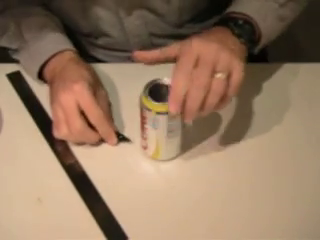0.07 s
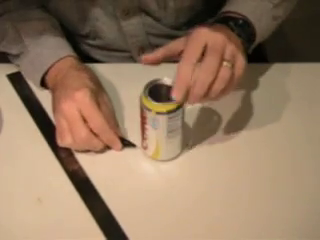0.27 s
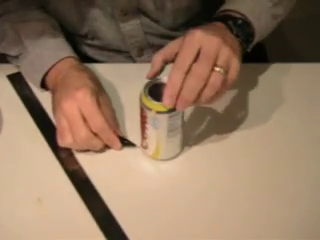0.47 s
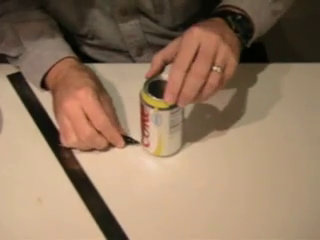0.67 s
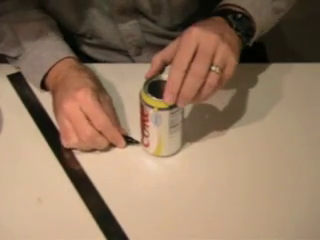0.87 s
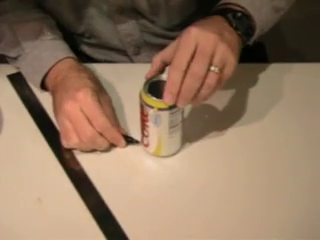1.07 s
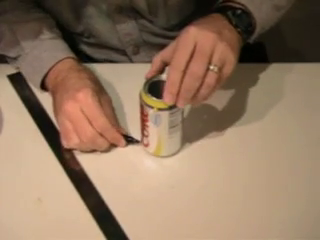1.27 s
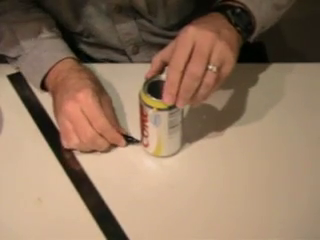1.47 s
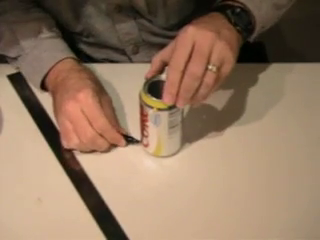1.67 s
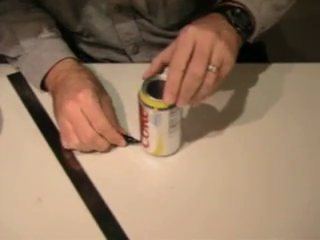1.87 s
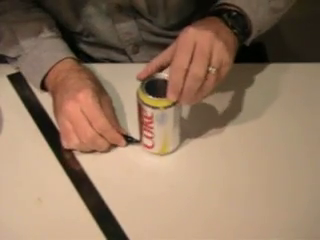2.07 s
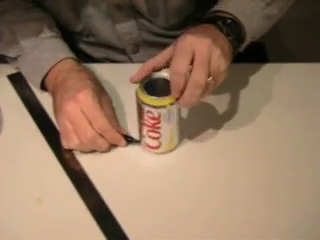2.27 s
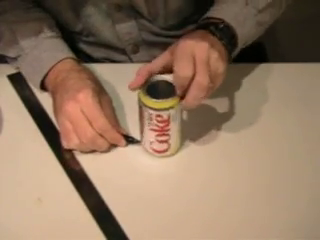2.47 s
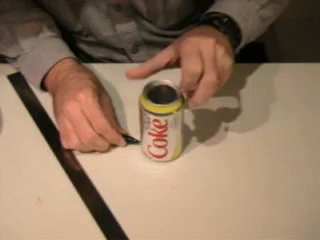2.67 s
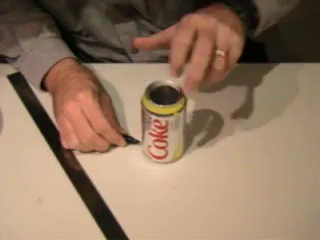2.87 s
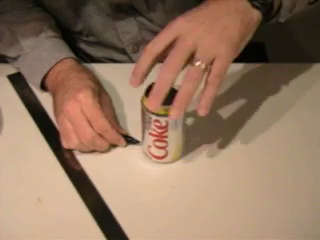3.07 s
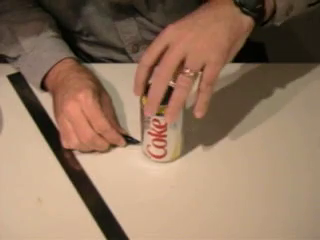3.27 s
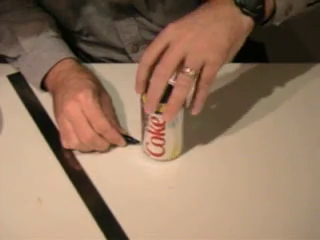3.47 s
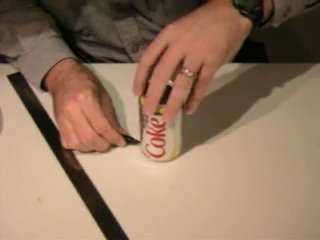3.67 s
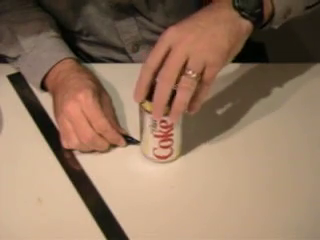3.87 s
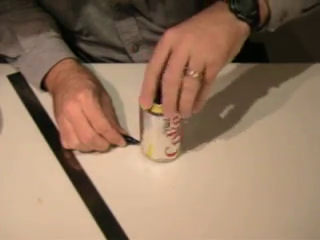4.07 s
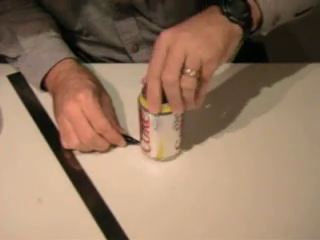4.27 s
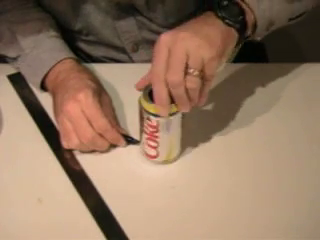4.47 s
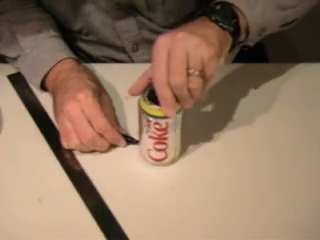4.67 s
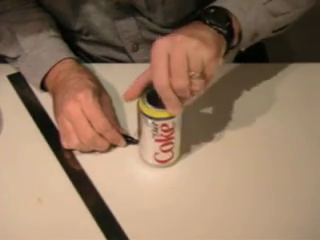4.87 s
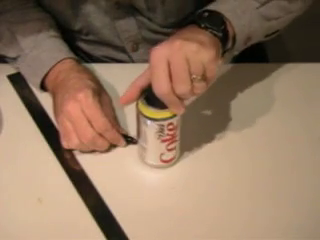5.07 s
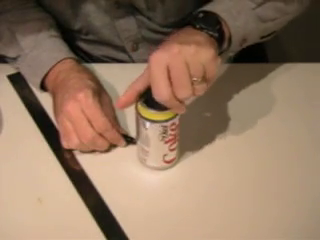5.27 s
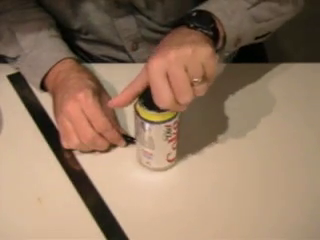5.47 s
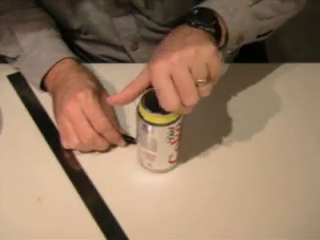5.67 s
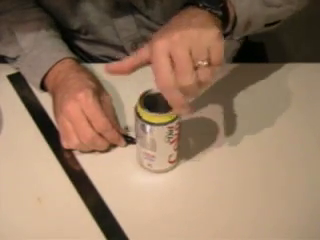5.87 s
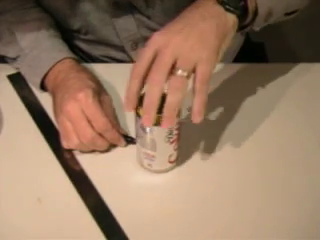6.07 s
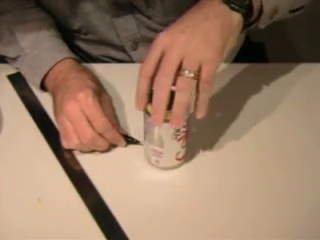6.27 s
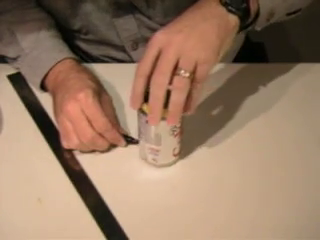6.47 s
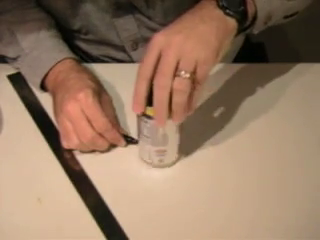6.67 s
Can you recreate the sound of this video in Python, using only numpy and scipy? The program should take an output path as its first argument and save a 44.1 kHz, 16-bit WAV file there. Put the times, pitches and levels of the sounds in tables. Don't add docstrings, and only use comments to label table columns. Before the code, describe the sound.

Hollow clunks, thin metallic ticks and gritty rubbing as fingers twist an empty drink can on a table in a quiet, humming room.

```python
import sys
import numpy as np
from scipy import signal
from scipy.fft import rfft, irfft
from scipy.io import wavfile

SR = 44100
rng = np.random.default_rng(int(sys.argv[2]) if len(sys.argv) > 2 else 0)


def ratio_of_db(decibels):
    return 10 ** (np.asarray(decibels, float) / 20)


def waveform_to_disk(signal):
    frames = np.transpose(np.atleast_2d(signal))
    scaled = np.clip(frames, -1, 1) * 32767
    samples = np.round(scaled).astype(np.int16)
    wavfile.write(sys.argv[1], SR, samples)


N = 296352
GRID = 32
BLOW_SAMPLES = 1400

# pitch_hz, level_db, t60_s
TABLETOP_MODES = [(92, -14, .2), (118, -12, .15), (155, -3, .14), (188, -9, .08), (221, -1, .14)]
CAN_AIR_MODES = [(470, -10, .05), (521, 0, .12), (557, -5, .09), (600, -8, .06), (642, -9, .06),
                 (687, -7, .09), (726, -7, .09), (798, -10, .06), (875, -9, .06), (1018, -11, .05),
                 (1120, -13, .04)]
WALL_MODES = [(1300, 0, .02), (1550, -2, .012), (1780, -1, .015), (2030, -3, .012)]
SHELL_MODES = [(2210, -3, 0.034), (2424, -10.5, 0.032), (2710, -6, 0.027), (2850, -3.5, 0.047),
               (2980, 1, 0.022), (3114, -6, 0.02), (3400, -4, 0.026), (3650, -13.5, 0.035)]
RIM_MODES = [(3920, -1.5, .006), (4410, -0.5, .006), (4870, -4.5, .005), (5530, -5, .005),
             (6050, -7.5, .005), (6500, -8.5, 0.0058), (6960, -13.5, 0.0058)]
BASE_MODES = [(314.2, -1, 0.085), (349.8, 4.5, 0.085), (397, 1.5, 0.033)]
# pitch_hz, level_db, t60_s
SINGING_MODES = [(5550, 0, .09), (6480, 0, .06), (4380, 0, .05)]
# pitch_hz, level_db, t60_s
DRAGGED_RIM_MODES = [(3950, 0, .03), (4650, -9, .02), (6500, -19, .035)]
# pitch_hz, level_db, t60_s
CONTACT_MODES = [(864, 3, 0.0028), (1692, -1.5, 0.0051), (2900, 1, 0.0031), (4550, -10, 0.0032)]

# freq_hz, level_db_per_hz
GRIT_COLOUR = [(53, -38), (90, -16), (154, 4.5), (259, -10.5), (342, 1), (1570, -9), (1750, -8),
               (2110, -18.5), (2840, -21.5), (6430, -35.5), (7600, -66), (9880, -77), (16700, -120)]
# freq_hz, level_db_per_hz
AIR_COLOUR = [(41, -34), (70, -2), (108, -7.5), (151, -9), (206, -10), (261, -19), (462, -22), (816, -27.5),
              (1500, -33.5), (1660, -27.5), (3170, -34.5), (5180, -42), (7670, -63.5), (9970, -95),
              (16900, -120)]
# freq_hz, level_db_per_hz
SKIN_COLOUR = [(1500, -17), (2300, -3), (3200, -0.5), (4000, -5), (4800, -8.5), (5800, -14.5),
               (6800, -23.5), (9000, -50.5)]
# freq_hz, level_db_per_hz
CRACK_COLOUR = [(400, -12), (900, 1.5), (2000, -4.5), (3500, -9.5), (5500, -17), (7500, -24.5), (9000, -50)]
# pitch_hz, level_db_rms
HUM_TONES = [(59.0, -57.5), (118.0, -73)]

# time_s, free_shell_pitch_hz, dragged_metal_ring_db
GRIP = [(0, 3280, 0), (.36, 3190, -2), (.49, 2800, 2.5), (.6, 2800, 4), (.68, 3070, -0.5), (1.9, 2900, 1),
        (2.44, 2850, 7), (2.5, 3400, 1), (2.65, 3400, 0.5), (2.72, 2800, -8.5), (4.2, 2870, -0.5),
        (4.3, 2850, 0.5), (4.45, 2810, -2), (5.3, 2850, -2), (5.45, 3650, -5), (5.55, 2920, -3.5),
        (6.72, 2850, 6)]
# start_s, length_s, grind_db, scratch_over_grind_db, hiss_over_scratch_db
PUSHES = [(-.07, 0.47, -54, -2, -12), (0.512, .12, -48, -7.5, -5.5), (0.62, 0.11, -55, -10, 5),
          (0.69, 0.16, -61, -9.5, 0.5), (1.945, 0.23, -60.5, -9.5, -3.5), (2.08, 0.37, -57.5, -15, 0.5),
          (2.379, 0.2, -50, -8, -8), (2.572, 0.096, -58, -14, -1), (2.687, 0.14, -53, -8.5, -13),
          (3.42, 0.12, -57.5, -19, -5), (3.578, 0.33, -55.5, -14, -8), (3.68, 0.35, -55.5, -7.5, -6),
          (3.95, 0.33, -51.5, -6, -9.5), (4.249, 0.2, -55, -16.5, 1), (4.366, .13, -49.5, -10, -7),
          (4.466, 0.27, -50, -6, -9), (4.652, 0.42, -55, -2.5, -9), (5.007, 0.27, -55.5, -8, -6),
          (5.238, .17, -54.5, -9, -6.5), (5.351, 0.24, -56.5, -3.5, -8.5), (5.622, 0.09, -58.5, -9.5, -3.5),
          (5.692, 0.16, -54, -23, -3), (6.343, 0.12, -46, -14, -13), (6.468, 0.062, -48.5, -9, -11)]
# start_s, grind_db, scratch_over_grind_db, fade_db_per_s
JERKS = [
    (.385, -66.5, -5, 20.5),
    (2.88, -81, -0.5, 31),
    (1.2, -60, -18, 252),
    (0.483, -46, -11.5, 149),
    (1.85, -45.5, -20, 201),
    (3.274, -43, -19.5, 196),
    (6.132, -37.5, -14, 107),
    (6.42, -56, -16.5, 1.5),
]
# start_s, length_s, load_db
LEANS = [(-.1, 0.72, -48), (0.526, 0.38, -58), (1.25, 0.34, -64.5), (1.897, 0.35, -62),
         (2.085, 0.29, -53.5), (2.375, 0.16, -44.5), (2.58, 0.13, -54.5), (2.729, .2, -51),
         (3.3, 0.25, -60), (3.633, 0.5, -56), (4.134, 0.14, -56.5), (4.338, 0.18, -49), (4.673, 0.32, -58),
         (4.952, 0.36, -51), (5.51, 0.1, -51), (5.612, 0.063, -57), (5.702, 0.24, -48.5),
         (6.122, 0.23, -48.5), (6.381, 0.23, -53.5)]
# load_db, grind_db, scratch_db, hiss_db
REST_LEVELS_DB = (-71, -69.5, -91, -94.5)

# time_s, peak_db, table_boom_db, contact_ms
PATS = [(.512, -40, -19, 5), (.554, -32.5, -8, 3.4), (.574, -35.5, -3.5, 8.5), (1.05, -50, -20, 3.2),
        (1.114, -53, 4.5, 2), (1.425, -50.5, 5, 4.5), (1.61, -52.5, -18, 5.2), (1.846, -37.5, -14, 4),
        (2.456, -54, 10, 7.9), (2.486, -49, 5, 3.9), (2.724, -25.5, 2.5, 8.4), (2.748, -35.5, 7.5, 2.6),
        (3.838, -41.5, -10, 2.8), (4.449, -60, -7, 3.1), (5.076, -63, 8, 2.9), (5.789, -42, -9.5, 7.3),
        (5.83, -45, 5, 9.5), (6.143, -24.5, -7, 2.7), (6.149, -24.5, -6, 5), (6.176, -33, -5, 2.6),
        (6.221, -46, -20, 6.3), (6.28, -30, -12.5, 1.4), (6.382, -42, -4, 5), (6.424, -38, -9, 3.5),
        (6.482, -43, -15, 3.5)]
# time_s, peak_db, table_boom_db, base_thud_db
ROCKS = [(.497, -40.5, 3, 2), (.529, -40, 5, 2.5), (.598, -38.5, -11, -1.5), (.754, -58.5, 11, 4),
         (0.878, -64.5, 18, -12), (2.442, -37.5, -5, 0), (2.677, -50.5, 12.5, 2), (2.707, -37.5, -14, 2),
         (2.73, -35.5, 1, -0.5), (2.783, -43.5, 12, 1), (2.798, -56.5, 6, 4.5), (2.823, -51, 9, -5),
         (3.217, -65.5, -14, 2), (3.277, -37, -2.5, 9.5), (3.283, -43, 0, -5), (3.35, -47.5, -7, -5),
         (3.782, -44.5, -5, -9), (4.422, -37.5, -4.5, -8), (5.141, -51.5, 11, -10), (5.258, -47, -15, -5),
         (5.559, -40, 1.5, -1.5), (5.645, -38.5, -0.5, -1), (5.659, -49, 4.5, 1), (5.76, -33, 3.5, -4.5),
         (5.778, -42.5, -8, -10), (6.203, -26.5, -19, -6.5)]
# time_s, peak_db, pitch_hz, fade_cycles
THUMPS = [(0.4973, -30.5, 330, 3.0), (.512, -37, 420, 3.0), (1.115, -51, 600, 2.5), (1.428, -52, 600, 2.5),
          (1.846, -34, 800, 3.4), (2.487, -41, 600, 3.0), (2.7215, -23, 597, 6.6), (2.781, -31.5, 400, 3.5),
          (3.217, -57, 600, 2.5), (3.781, -35, 700, 3.3), (4.423, -28, 420, 3.0), (5.077, -37.5, 230, 2),
          (5.14, -34.5, 260, 2.4), (5.257, -43, 600, 3.0), (5.558, -40, 300, 4.0), (5.645, -41, 480, 4.4),
          (5.759, -33.5, 520, 7.5), (6.144, -27, 600, 3.9), (6.1494, -18, 475, 4.0),
          (6.2026, -19, 620, 4.4), (6.38, -36, 900, 3.0), (6.419, -37, 600, 3.0)]
# time_s, peak_db, brightness_db, free_pitch_hz
CATCHES = [(.157, -45, -31, 3630), (.4279, -66, -30, 3230), (.4987, -44, -20, 2900), (.5411, -42, -5, 3200),
           (.5506, -34, -12, 3050), (.7603, -55, -12, 2630), (.882, -61, -10, 3040),
           (1.7923, -44.5, -16, 3320), (1.81, -49, -9.5, 3420), (2.038, -46, -14, 3150),
           (2.1595, -39, -17, 2980), (2.4864, -35, -28, 3270), (2.544, -49, -25, 3460),
           (2.6134, -48.5, -25, 3530), (2.7257, -41.5, -11, 2680), (3.4927, -55, -12, 2760),
           (3.6108, -42, -21, 2840), (4.4224, -34, -24, 3460), (5.5104, -40, -18, 2950),
           (5.5425, -46, -21, 2920), (5.5804, -53.5, -10.5, 2900), (5.6441, -50, -22, 2950),
           (6.1424, -31, -15, 2940), (6.2202, -37.5, -14, 2850), (6.2783, -41, -11, 2900),
           (6.3994, -49, -6, 2720), (6.4903, -44.5, -6.5, 2930)]
# time_s, peak_db, brightness_db
TAPS = [(.845, -56, -11), (1.051, -63, -16), (1.426, -62, -11), (1.4592, -56, -21), (1.61, -42.5, -9),
        (1.8453, -37, -7), (2.676, -60, -10), (2.7046, -61, -18), (2.7198, -45, -23), (2.781, -48.5, -10),
        (3.2737, -52.5, -10), (3.2843, -44, -14), (3.3626, -57, -4), (3.5552, -59, -22), (3.6455, -53, -6),
        (3.77, -50, -24), (4.149, -43.5, -16), (5.206, -58, -9), (5.2798, -52, -9), (5.741, -47, -9),
        (5.7589, -43, -14), (5.78, -56.5, 1.5), (6.1485, -47, -6), (6.176, -62, -7), (6.2031, -34, -26),
        (6.341, -48, -7), (6.473, -49, -10)]
# time_s, upper_tone_db, lower_over_upper_db
PINGS = [
    (2.6778, -88, 16),
    (2.7276, -58.5, 1),
    (2.7805, -71, 6),
    (5.7409, -69, -10.5),
    (5.7593, -61, -16),
    (5.7844, -62, -9),
]
# time_s, peak_db
CHIRPS = [
    (2.6793, -73),
    (5.714, -67),
]
# time_s, peak_db, chatter_ms, free_pitch_hz
SLIPS = [(.048, -48, 6.5, 3300), (.401, -64, 1.5, 3200), (.455, -64, 1.5, 3200), (.598, -47.5, 3.0, 3300),
         (.66, -47, 3.0, 3400), (3.73, -58, 3.0, 3600), (3.8195, -51.5, 3.0, 3400), (3.948, -54, 4.0, 3000),
         (4.0415, -58, 4.0, 2900), (4.081, -49, 12.0, 2900), (4.105, -51, 8.2, 2900), (4.2, -48, 6.0, 2900),
         (4.409, -52, 3.0, 3000), (4.512, -55, 4.0, 2900), (4.551, -53, 4.0, 2900), (4.573, -50, 3.0, 3200),
         (4.751, -50, 3.0, 2900), (4.788, -48, 12.0, 2850), (4.852, -53, 3.0, 3000),
         (4.975, -54, 4.0, 2900), (5.1415, -55, 3.0, 3000), (5.183, -56, 3.0, 3000),
         (5.459, -50, 5.0, 3600), (5.479, -51, 4.0, 3600), (6.238, -42, 6, 2900), (6.38, -48, 3.0, 2800),
         (6.593, -57, 3.0, 2900), (5.661, -56, 2.5, 3000), (5.5, -58, 1.5, 3000), (5.558, -56, 2.5, 3000),
         (6.435, -56, 2.5, 2900), (6.513, -52, 3.0, 2950), (6.162, -46, 3.0, 3300), (.512, -50, 3.0, 2900),
         (.575, -47, 5.0, 3200), (.7, -56, 4.0, 3300), (2.45, -50, 5.0, 2900), (2.465, -50, 5.0, 3000),
         (3.555, -58, 1.5, 2900)]
# start_s, length_s, pitch_hz, level_db
WHINES = [(0.039, .16, 3300, -61), (.53, .07, 3050, -56), (2.1, 0.22, 4000, -75), (2.17, .08, 2200, -71),
          (2.21, .09, 2930, -68), (2.409, .08, 2850, -60), (2.47, 0.05, 3400, -63), (3.79, .08, 3500, -70),
          (3.821, .05, 1770, -63), (4.07, .07, 2900, -60), (4.11, .12, 1780, -63), (4.17, 0.06, 2900, -64),
          (4.21, .2, 6500, -84.5), (4.6, .1, 1780, -63), (4.78, 0.058, 2850, -61), (5.048, .07, 4680, -77),
          (5.17, .06, 4700, -78), (5.26, .05, 2900, -69), (5.39, .06, 4700, -76), (5.452, 0.045, 3850, -66),
          (5.521, .07, 2940, -64.5), (.07, .11, 345, -58), (.3, .07, 680, -64), (2.0, .24, 6500, -88),
          (2.23, .1, 540, -64), (5.65, .08, 530, -58), (5.76, .05, 560, -50), (5.79, .16, 630, -62),
          (6.23, .08, 2900, -58), (6.37, .08, 1050, -56), (6.42, .05, 2900, -66), (5.76, .08, 5550, -80)]
# time_s, level_db, t60_s
CRACKS = [
    (.4985, -56, .1),
    (1.61, -58.5, 0.086),
    (1.8455, -48, .12),
    (2.72, -49.5, .08),
    (2.781, -54, .06),
    (3.2745, -53, 0.074),
    (5.759, -55, .06),
    (6.144, -44, 0.073),
    (6.2032, -50, .06),
    (6.279, -50, 0.079),
]

AIR_DB, FAINT_NOISE_DB = -66, -101
CUTOFF_HZ, RUMBLE_CUT_HZ = 7090, 115
ROOM_T60_S, ROOM_DB = 0.21, -11.5
RISE_SHARE, FALL_SHARE, RAMP_POWER = 0.37, 0.34, 0.66
LEAN_RISE_SHARE, LEAN_FALL_SHARE = 0.43, 0.56
JERK_RISE_S, JERK_HISS_DB = 0.016, -2.5
PAT_THUD_DB, ROCK_MS = -14.5, 4
CATCH_DULL_DB, TAP_DULL_DB, HELD_HZ = -11, 1, 2800
THUMP_RISE_CYCLES = .25
SWEEP_S, SWEEP_LENGTH_S, SWEEP_DB = 0.012, .37, -56.5
WHINE_T60_S = 0.013


def rms_one(x):
    return x / np.sqrt(np.mean(x ** 2) + 1e-20)


def in_time(rows):
    s, *columns = np.transpose(rows)
    return [np.interp(np.arange(N) / SR, s, c) for c in columns]


def drift(rate):
    r = np.exp(-80 * np.pi * rate / SR)
    slow = signal.lfilter([1], [1, -2 * r, r * r], rng.standard_normal(N // 40 + 2002))[2000:]
    return np.interp(np.arange(N) / 40, np.arange(len(slow)), rms_one(slow))


def colour(x, spectrum, low_hz=20, high_hz=9000):
    hz = np.fft.rfftfreq(N, 1 / SR) + 1
    point_hz, point_db = np.transpose(spectrum)
    edges = 1 / np.sqrt((1 + (low_hz / hz) ** 6) * (1 + (hz / high_hz) ** 6))
    gain = ratio_of_db(np.interp(np.log(hz), np.log(point_hz), point_db))
    return rms_one(irfft(rfft(x) * edges * gain, N))


def ring(force, hz, t60):
    r, w = ratio_of_db(-60 / (t60 * SR)), 2 * np.pi * hz / SR
    return signal.lfilter([0, np.sin(w)], [1, -2 * r * np.cos(w), r * r], force + 1e-18)


def shortened(modes, share):
    return [(hz, db, share * t60) for hz, db, t60 in modes]


def grip_db(hz, db, free_hz):
    if free_hz is None:
        return 0
    return -.7 * db - 6.5 * ((hz - free_hz) / 463.0) ** 2


def grains(per_s, spread_db):
    sizes = ratio_of_db(spread_db * np.minimum(rng.exponential(1, N), 3.0)) * rng.choice([-1, 1], N)
    happens = rng.random(N) < per_s / SR
    return rms_one(sizes * happens) * ratio_of_db(0.85 * drift(17))


def rubbed(modes, low_hz, high_hz, per_s, spread_db, ring_db, wander_db, free_hz=None):
    slip_force = grains(per_s, spread_db)
    tones = 0
    for hz, db, t60 in modes:
        level_db = db + grip_db(hz, db, free_hz) + wander_db * drift(2.6)
        tones = tones + ratio_of_db(level_db) * ring(slip_force, hz, t60)
    grit = colour(slip_force, GRIT_COLOUR, low_hz, high_hz)
    return rms_one(grit + ratio_of_db(ring_db) * rms_one(tones))


def struck(times, peak_db, modes, length_ms, vary_db, free_hz=None):
    t = np.arange(BLOW_SAMPLES) / SR
    tau_s = np.maximum(np.broadcast_to(length_ms, np.shape(times)), .05)[:, None] / 1000
    chance = rng.standard_normal((len(times), len(t) + len(modes)))
    rattle = chance[:, :len(t)] * np.exp(-t / tau_s) * (1 - np.exp(-t / .0003))
    rattle = rattle / np.sqrt(np.sum(rattle ** 2, axis=1, keepdims=True))
    at = np.round(np.asarray(times) * SR).astype(int)[:, None] + np.arange(len(t))
    out = 0
    for k, (hz, db, t60) in enumerate(modes):
        luck = np.maximum(np.abs(rattle @ np.exp(2j * np.pi * hz * t)), .5)
        level_db = peak_db + db + grip_db(hz, db, free_hz) + vary_db * chance[:, len(t) + k]
        hits = rattle * (ratio_of_db(level_db) / luck)[:, None]
        force = np.bincount(at.ravel(), hits.ravel(), N + 2 * len(t))[:N]
        out = out + (-1) ** k * ring(force, hz, t60)
    return out


def room_tone():
    return ratio_of_db(AIR_DB + 1.5 * drift(3.2)) * colour(rng.standard_normal(N), AIR_COLOUR)


def hum():
    t = np.arange(N) / SR + 0.000065 * drift(0.98)
    out = 0
    for hz, db in HUM_TONES:
        out = out + np.sqrt(2) * ratio_of_db(db + 0.11 * drift(4.8)) * np.sin(2 * np.pi * hz * t)
    return out


def room(x):
    t = np.arange(SR // 2) / SR
    dull = signal.lfilter([.4], [1, -.6], rng.standard_normal(len(t)))
    tail = dull * ratio_of_db(-60 * t / ROOM_T60_S) * (t > .004)
    return ratio_of_db(ROOM_DB) * signal.fftconvolve(x, tail / np.sqrt(np.sum(tail ** 2)))[:N]


def sweep():
    t = (np.arange(N) / SR - SWEEP_S) / SWEEP_LENGTH_S
    shape = np.clip(np.minimum(t / 0.12, (1 - t) / .25), 0, 1)
    return ratio_of_db(SWEEP_DB) * shape * colour(grains(5000.0, spread_db=3.0), SKIN_COLOUR)


def cracks():
    t = np.arange(N) / SR
    fading = 0
    for s, db, t60 in CRACKS:
        fading = fading + ratio_of_db(db - 60 * np.maximum(t - s, 0) / t60) * (t >= s)
    return fading * colour(rng.standard_normal(N), CRACK_COLOUR)


def thumps():
    s, db, hz, cycles = np.transpose(THUMPS)[:, :, None]
    t = np.arange(BLOW_SAMPLES) / SR
    onset = 1 - np.exp(-t * hz / THUMP_RISE_CYCLES)
    pulses = ratio_of_db(db - 30 * t * hz / cycles) * np.sin(2 * np.pi * hz * t) * onset
    at = np.round(s * SR).astype(int) + np.arange(len(t))
    return np.bincount(at.ravel(), pulses.ravel(), N)[:N]


def knocks():
    pats = [(s, db, boom_db, PAT_THUD_DB, ms) for s, db, boom_db, ms in PATS]
    rocks = [(*row, ROCK_MS) for row in ROCKS]
    s, db, table_db, base_db, ms = np.transpose(pats + rocks)
    hoot = struck(s, db - 4, shortened(CAN_AIR_MODES, 0.82), 0.66 * ms, vary_db=2.5)
    thud = struck(s, db + base_db - 1.5, BASE_MODES, 0.86 * ms, vary_db=3.0)
    slap = struck(s, db - 12, CONTACT_MODES[:2], 1.3 * ms, vary_db=2.0)
    boom = struck(s, db + table_db - 3.0, TABLETOP_MODES, 0.71 * ms, vary_db=1.5)
    return hoot + thud + slap + boom


def ticks():
    catches = [(s, db, bright_db, CATCH_DULL_DB, hz) for s, db, bright_db, hz in CATCHES]
    taps = [(*row, TAP_DULL_DB, HELD_HZ) for row in TAPS]
    s, db, bright_db, dull_db, free_hz = np.transpose(catches + taps)
    shell = struck(s, db - 4.0, shortened(SHELL_MODES, 0.59), 1.1, vary_db=3.0, free_hz=free_hz)
    rim = struck(s, db + bright_db + 0.5, RIM_MODES, 1.8, vary_db=1.5)
    wall = struck(s, db + dull_db - 6.0, WALL_MODES, 0.92, vary_db=4.5)
    contact = struck(s, db + dull_db - 5.0, CONTACT_MODES, 4.1, vary_db=2.5)
    return shell + rim + wall + contact


def singing_rim():
    s, db, lower_db = np.transpose(PINGS)
    lower = struck(s, db + lower_db - 6.0, SINGING_MODES[:1], 2.7, vary_db=-5.5)
    upper = struck(s, db - 3.0, SINGING_MODES[1:2], 3.6, vary_db=1.5)
    s, db = np.transpose(CHIRPS)
    chirp = struck(s, db + 3.5, SINGING_MODES[2:], 8.7, vary_db=-0.5)
    return lower + upper + chirp


def slips():
    s, db, ms, free_hz = np.transpose(SLIPS)
    shell = struck(s, db - 1.0, shortened(SHELL_MODES, 0.4), ms, vary_db=2.0, free_hz=free_hz)
    return shell + struck(s, db - 12.5, RIM_MODES, 0.6 * ms, vary_db=1.5)


def whines():
    out, t = np.zeros(N), np.arange(SR // 4) / SR
    for s, length, hz, db in WHINES:
        swell = np.sin(np.pi * np.clip(t / length, 0, 1)) ** .5
        t60 = WHINE_T60_S * max(1, 2000.0 / hz)
        tone = rms_one(ring(rng.standard_normal(len(t)), hz, t60))
        first = int(s * SR)
        out[first:first + len(t)] += ratio_of_db(db) * swell * tone
    return out


def swells(start, length, rise, fall):
    t = (np.arange(0, N, GRID) / SR - start[:, None]) / length[:, None]
    return np.clip(np.minimum(t / rise, (1 - t) / fall), 0, 1) ** RAMP_POWER


def summed(shapes, db, rest_db):
    power = ratio_of_db(db) ** 2 @ shapes ** 2 + ratio_of_db(rest_db) ** 2
    return np.interp(np.arange(N), np.arange(0, N, GRID), np.sqrt(power))


def hand():
    rest_load_db, rest_grind_db, rest_scratch_db, rest_hiss_db = REST_LEVELS_DB
    s, length, db = np.transpose(LEANS)
    load = summed(swells(s, length, LEAN_RISE_SHARE, LEAN_FALL_SHARE), db, rest_load_db)
    s, length, push_db, push_scratch_db, push_hiss_db = np.transpose(PUSHES)
    jerk_s, jerk_db, jerk_scratch_db, fade_db_per_s = np.transpose(JERKS)
    t = np.arange(0, N, GRID) / SR - jerk_s[:, None]
    skids = np.clip(t / JERK_RISE_S, 0, 1) * ratio_of_db(-fade_db_per_s[:, None] * np.maximum(t, 0))
    slides = np.vstack([swells(s, length, RISE_SHARE, FALL_SHARE), skids])
    grind_db = np.r_[push_db, jerk_db]
    scratch_db = grind_db + np.r_[push_scratch_db, jerk_scratch_db]
    hiss_db = scratch_db + np.r_[push_hiss_db, JERK_HISS_DB + 0 * jerk_db]
    grind = summed(slides, grind_db, rest_grind_db)
    scratch = summed(slides, scratch_db, rest_scratch_db)
    return load, grind, scratch, summed(slides, hiss_db, rest_hiss_db)


def turning():
    load, grinding, scratching, hissing = hand()
    free_hz, free_db = in_time(GRIP)
    boom = load * rubbed(TABLETOP_MODES, 160, 280, per_s=900, spread_db=2.0, ring_db=0.5, wander_db=0.5)
    body_modes = BASE_MODES + CAN_AIR_MODES + WALL_MODES[:1]
    grind = grinding * rubbed(body_modes, 370, 1500, per_s=1500, spread_db=0.0, ring_db=-5.5, wander_db=9.0)
    scratch = scratching * rubbed(SHELL_MODES, 1400, 5600, per_s=3000, spread_db=2.5,
                                  ring_db=free_db, wander_db=2.0, free_hz=free_hz)
    hiss = hissing * rubbed(DRAGGED_RIM_MODES, 4000, 4100, per_s=4500, spread_db=2.5,
                            ring_db=1.8 * free_db - 13.5, wander_db=-2.0)
    judder = ratio_of_db(1.9 * drift(22))
    return boom + judder * (grind + scratch + hiss)


def scene():
    background = room_tone() + hum()
    blows = knocks() + ticks() + singing_rim() + thumps()
    rubs = turning() + slips() + sweep() + whines()
    can = blows + room(blows) + rubs + cracks()
    can = signal.sosfilt(signal.butter(4, RUMBLE_CUT_HZ, "high", fs=SR, output="sos"), can)
    return (can + background)[None]


def band_limit(x):
    return signal.sosfilt(signal.butter(12, 7820, fs=SR, output="sos"), x)


def record(dry):
    narrow = signal.sosfilt(signal.butter(18, CUTOFF_HZ, fs=SR, output="sos"), dry)
    faint_noise = ratio_of_db(FAINT_NOISE_DB) * rng.standard_normal(dry.shape)
    return band_limit(narrow + faint_noise)


dry = scene()
out = record(dry)
waveform_to_disk(out)
```